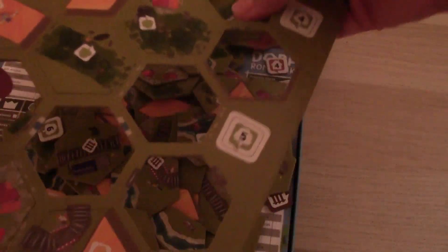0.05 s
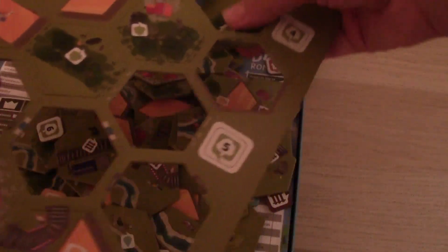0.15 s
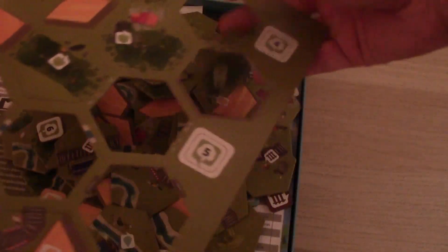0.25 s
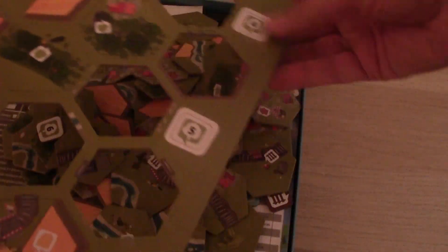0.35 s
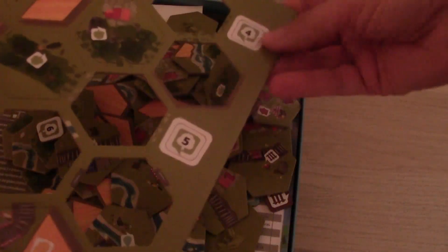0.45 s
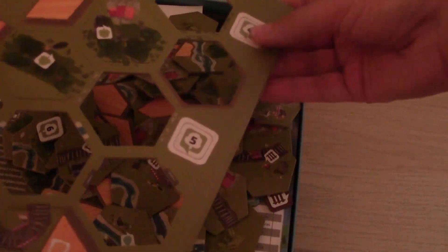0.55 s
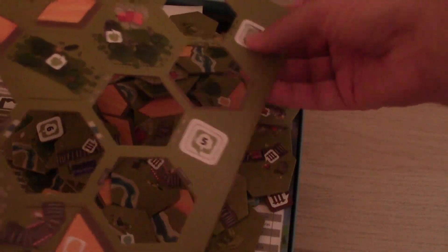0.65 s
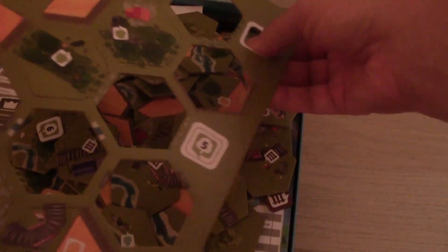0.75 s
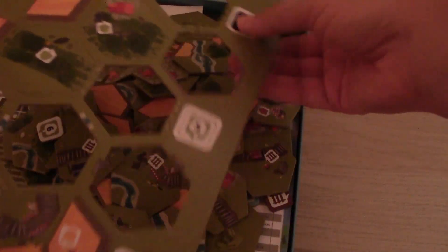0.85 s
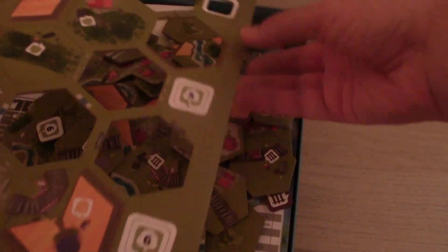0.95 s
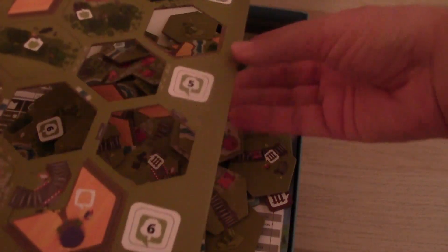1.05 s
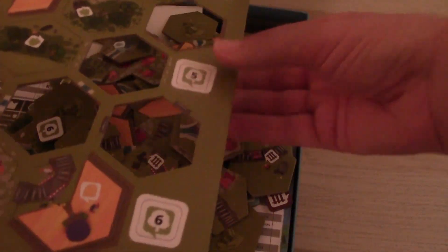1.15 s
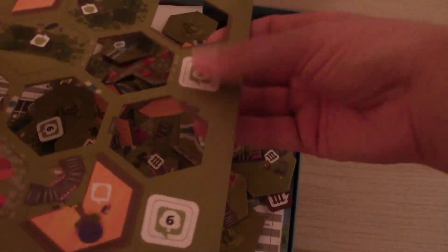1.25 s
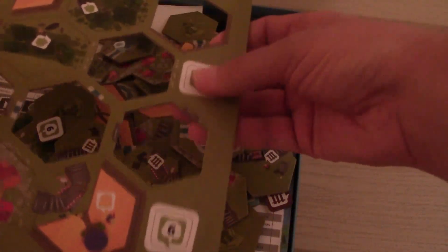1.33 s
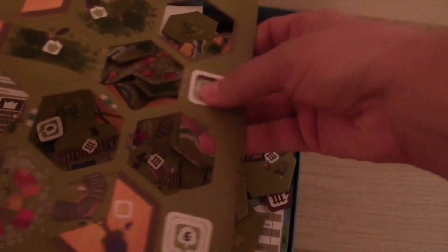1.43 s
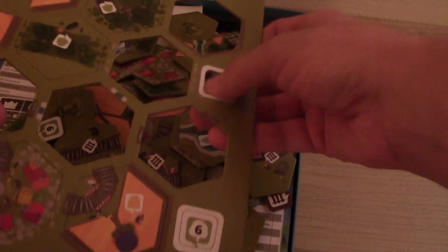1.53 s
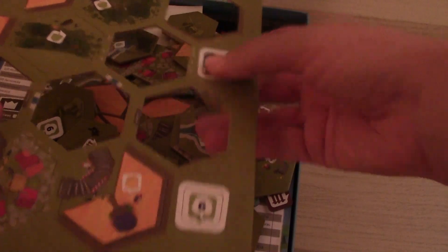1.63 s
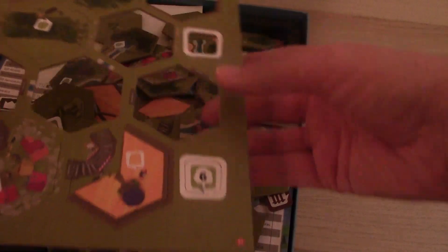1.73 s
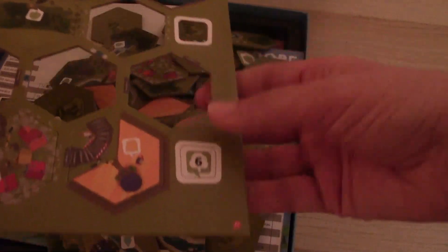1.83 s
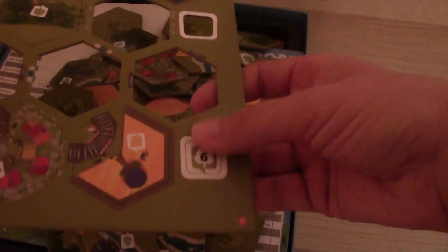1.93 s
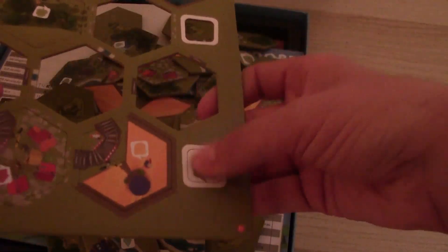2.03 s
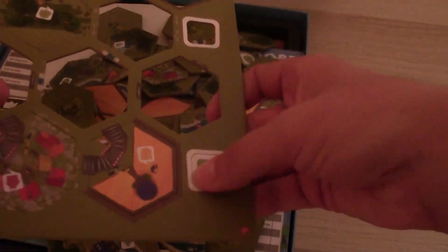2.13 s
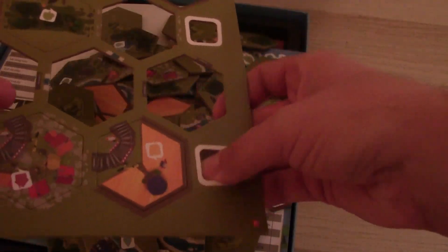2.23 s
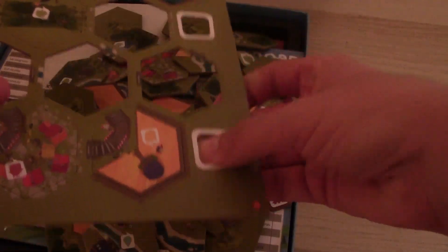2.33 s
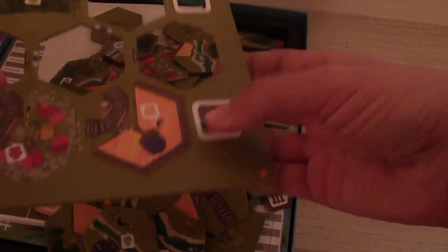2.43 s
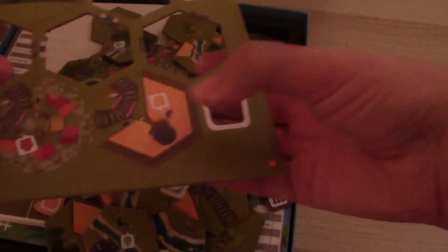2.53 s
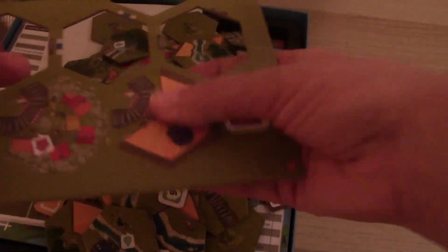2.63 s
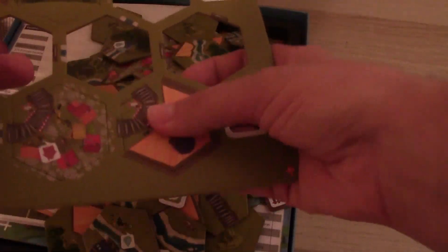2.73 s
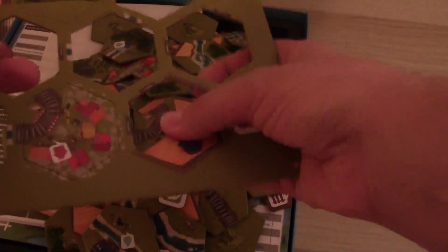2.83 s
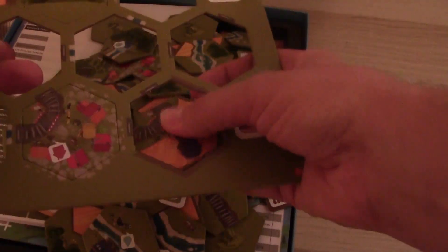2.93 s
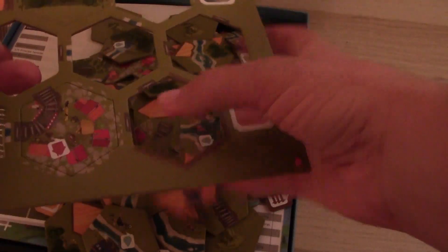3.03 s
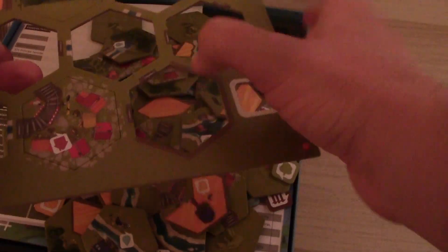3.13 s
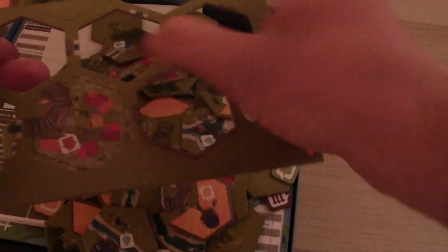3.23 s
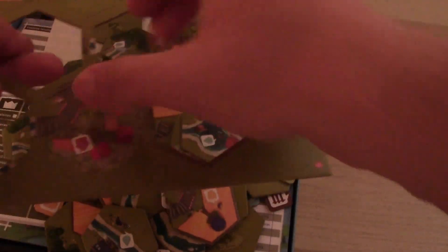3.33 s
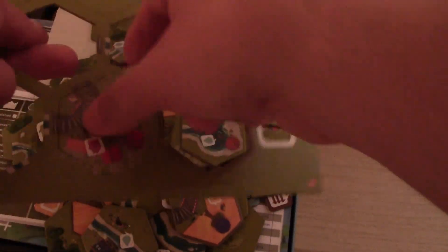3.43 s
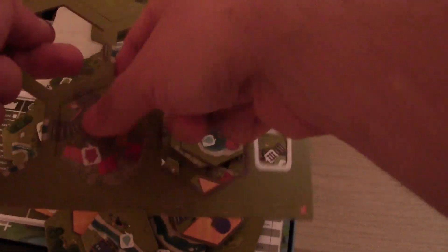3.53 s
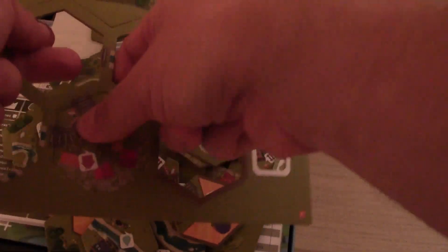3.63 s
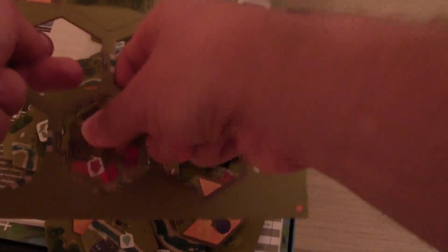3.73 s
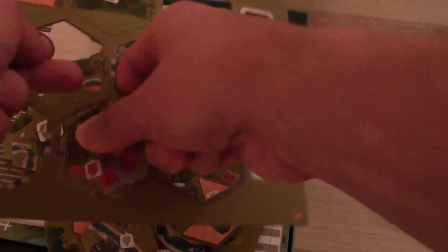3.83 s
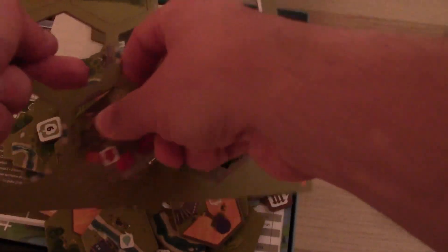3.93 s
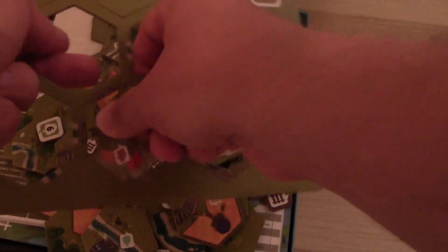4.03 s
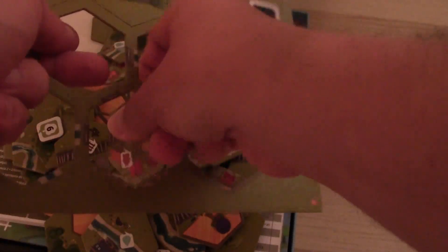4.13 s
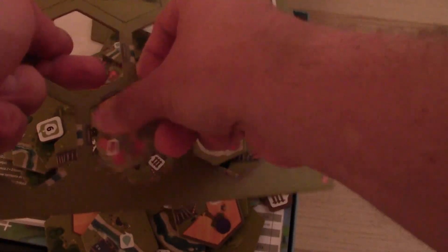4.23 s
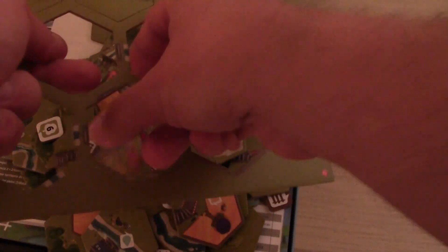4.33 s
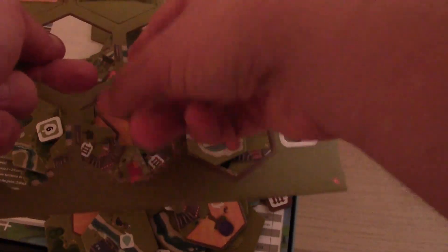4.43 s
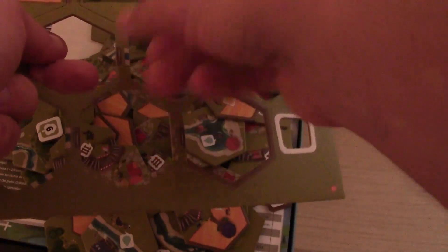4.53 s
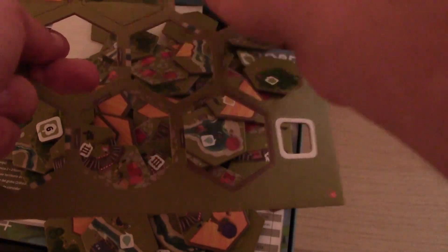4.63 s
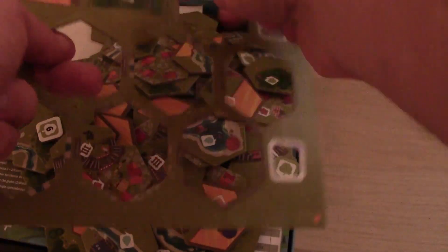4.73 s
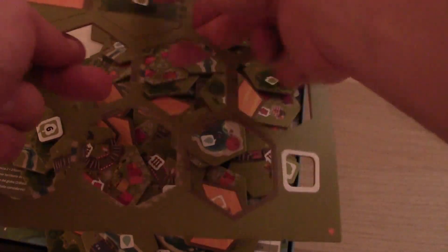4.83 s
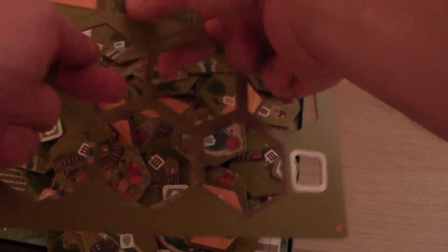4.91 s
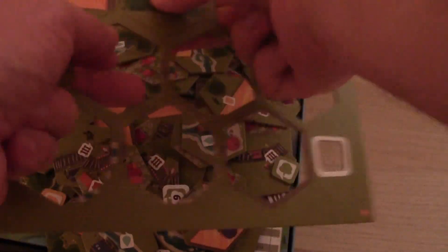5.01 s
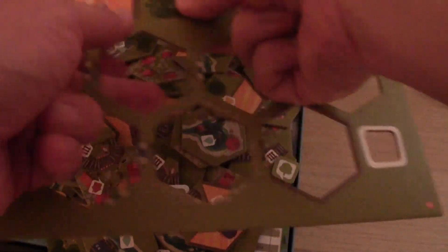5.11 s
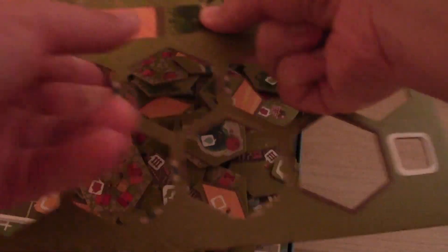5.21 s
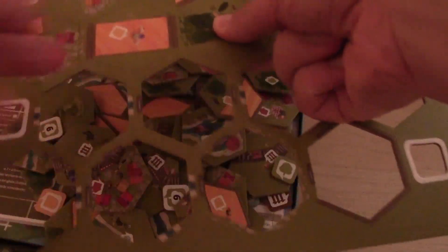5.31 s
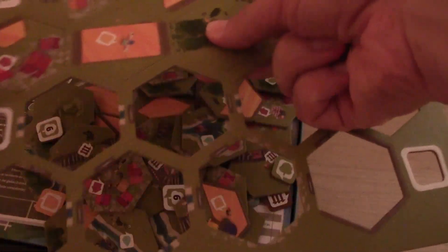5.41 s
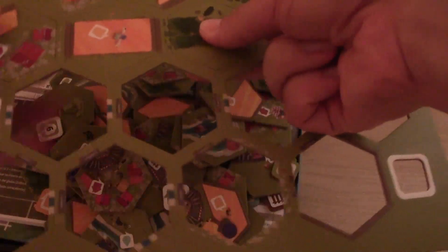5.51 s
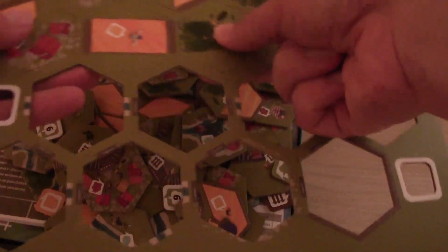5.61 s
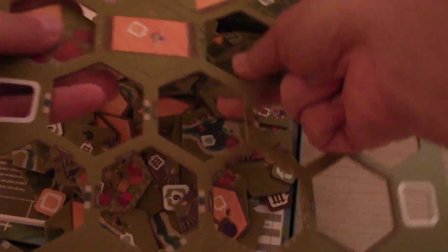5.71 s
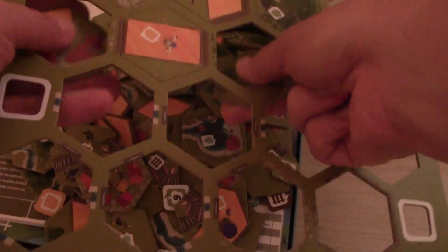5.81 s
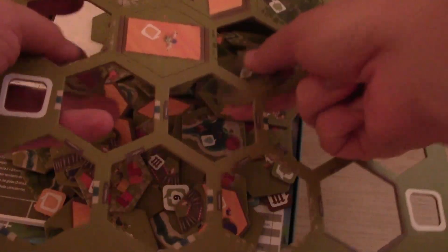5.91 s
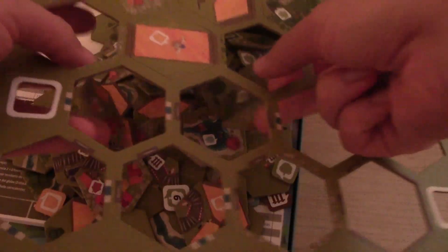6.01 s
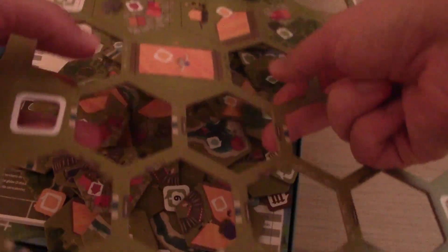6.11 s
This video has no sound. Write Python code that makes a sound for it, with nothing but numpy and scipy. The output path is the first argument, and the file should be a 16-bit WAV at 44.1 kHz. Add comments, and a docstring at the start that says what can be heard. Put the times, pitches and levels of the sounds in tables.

```python
"""Hands punch thick cardboard tiles out of a sheet, close to two microphone ports in a quiet room.
The first bridges tear at once in short bursts of fibre cracks; from 0.35 s freed tiles land in the box
below, ring and settle on the pile. Tears and knocks alternate, with rubbing and low swings of the sheet.
From 4.8 s the sheet is shifted in the hands and stops short at 5.35 s; the last bridges tear near 5.75 s
and the last tile lands near 6.1 s. Steady grip friction, faint creaks and room tone run throughout."""
import sys
import numpy as np
from scipy import signal
from scipy.fft import rfft, irfft, next_fast_len
from scipy.io import wavfile
from scipy.ndimage import uniform_filter1d

SR = 44100
rng = np.random.default_rng(int(sys.argv[2]) if len(sys.argv) > 2 else 0)


def materialize(psi):
    """Save the field psi as 16-bit PCM at rate SR to the path in sys.argv[1].

    A 1-D psi becomes a single channel; in a 2-D psi each row is a channel.
    """
    bounded = np.clip(np.atleast_2d(psi).T, -1, 1)
    quanta = np.round(bounded * 32767).astype(np.int16)
    wavfile.write(sys.argv[1], SR, quanta)


N = 271899

# Paper bridges tearing: start_s, length_s, crack_level_db, crack_pitch_hz, fibre_fizz_level_db
BRIDGE_TEARS = [(0.0834, 0.003, 7.5, 3970, 11), (0.0913, 0.0035, 5, 3610, 2), (0.719, 0.0026, 3, 5110, 9),
                (0.7281, 0.0028, -2.5, 1500, 14), (1.4625, 0.0048, -6, 5560, 5),
                (1.4994, 0.0026, 2, 5800, 12), (1.9383, 0.0039, 5, 3020, -9),
                (2.207, 0.0014, -3, 1110, -8.5), (2.2268, 0.0012, 1.5, 1220, 5.5),
                (2.236, .0013, 4, 1610, 8.5), (2.246, 0.0036, 1, 3860, 4.5),
                (2.711, 0.00085, -10, 2540, -10), (2.8172, 0.0026, -7.5, 3400, -2),
                (2.851, 0.0019, -6, 3200, -5), (2.858, 0.0035, 10.5, 3340, 9),
                (3.1325, 0.0038, 12.5, 2390, 6), (3.7437, 0.0042, 2, 1250, -7), (3.749, 0.0021, 5, 1160, 0),
                (3.7546, 0.003, 7, 1440, 9), (4.1286, 0.0067, 10.5, 3600, 7),
                (4.171, 0.0062, -3.5, 2480, -7), (5.733, 0.0061, 6.5, 4140, 12),
                (5.7481, 0.0032, 8.5, 2350, 7.5), (5.7543, 0.0056, 3.5, 3800, 1.5)]
# Tiles landing, bouncing or being tapped: start_s, box_level_db, tile_level_db, edge_tick_level_db
TILE_KNOCKS = [(0.3515, 5, 8.5, 1), (0.3549, 9.5, 9.5, -3), (0.371, -18, 3.5, -13), (0.6098, 6.5, 4, -3.5),
               (0.6141, -3.5, 4.5, -2.5), (0.7208, 10.5, 6, -7), (0.9801, -13, -9, -20),
               (0.9932, -3.5, 6.5, -8.5), (1.0321, -4.5, -7, -26), (1.0556, 5, 1, -22),
               (1.0757, -1, -10, -36), (1.12, -9, -7, -35), (1.1452, -4, -6, -19.5),
               (1.2111, -14.5, -18.5, -23.5), (1.345, -23, -20.5, -13.5), (1.7217, -5.5, 11.5, -6.5),
               (1.7963, -22, 1, -14.5), (1.8099, -20, -11, -35), (1.8562, -12, 9, -9),
               (1.9351, -20.5, 2, 0), (1.9458, -36, -1, -23), (2.018, -6.5, -8.5, -27),
               (2.5475, -3, 11, -13), (2.616, -20, -15, -11), (2.6265, -21.5, -6.5, -18),
               (2.6433, -23, -11, -12), (2.6522, -20, -10.5, -21), (2.6747, -19, -12, -21),
               (3.12, 2, 5, -7.5), (3.1369, 2.5, -10, -5), (3.1463, 6, -18, -23), (3.1795, -4, -9, -16.5),
               (3.2158, -16, 1, 0), (3.2965, -13, -15, -22), (4.4062, -6, 4, -9.5),
               (4.4129, -5.5, 7.5, -7.5), (4.4395, 9.5, 6.5, -13), (4.4429, 11.5, 8.5, 2),
               (4.4606, -8, 0, -7), (4.5093, -6, -1.5, -4), (4.7805, -21, -29, -34),
               (5.6304, 3.5, 2.5, -9.5), (5.64, -23, -3.5, -8), (6.0579, 4, 10, -2), (6.0815, 3, 12.5, -2),
               (6.157, -8, -2.5, -17)]
# Each falling tile's own pitch and spot in the box: from_s, favoured_tile_hz, favoured_box_hz
TILE_FALLS = [(.3, 1380, 705), (.55, 3480, 353), (.68, 1410, 490), (.9, 2130, 547), (1.6, 2830, 405),
              (2.4, 1890, 600), (3.05, 2350, 260), (4.3, 2480, 690), (5.5, 1140, 670), (5.95, 1780, 345)]
# Skin or a cut edge sliding on the sheet: start_s, length_s, scrape_level_db, hiss_level_db, resonance_hz
RUB_STROKES = [(-.02, 0.069, -38, -37, 3520), (0.206, .045, -50, -45, 5270),
               (0.389, 0.13, -41.5, -45, 2300), (.5, 0.22, -48, -45, 600), (0.638, 0.16, -44, -37, 9150),
               (0.874, 0.063, -50, -43.5, 4850), (1.336, 0.064, -54, -41, 3240),
               (1.667, 0.047, -42, -41.5, 700), (1.928, .12, -43, -39, 2520),
               (2.067, .11, -59, -38.5, 9300), (2.424, 0.048, -33.5, -39.5, 1070),
               (2.714, 0.04, -42, -40.5, 3390), (2.753, 0.055, -39.5, -41.5, 3500),
               (3.409, .12, -48.5, -50, 1870), (3.525, 0.1, -50, -48.5, 2840),
               (3.944, 0.057, -47.5, -41.5, 1194), (4.066, 0.048, -45.5, -42.5, 673),
               (4.553, .06, -39, -42, 1820), (5.208, 0.054, -34, -59, 780), (5.605, 0.16, -39, -41, 11200),
               (5.884, .09, -46, -40.5, 3970)]
# The sheet shifted in the hands: time_s, friction_level_db
SHEET_SHIFT = [(4.8, -76), (4.878, -50), (5.018, -51), (5.036, -46.5), (5.094, -47.5), (5.134, -41),
               (5.196, -49.5), (5.332, -32), (5.345, -44)]
# The sheet springing back or being pushed: start_s, level_db before damping, bending_pitch_hz
SHEET_FLEXES = [(.086, -31.5, 55.6), (1.351, -43.5, 108), (1.5, -41, 111.6), (1.939, -42.5, 46),
                (2.237, -46, 94), (2.712, -36.5, 61.7), (2.776, -34, 80.4), (2.857, -28, 62),
                (3.756, -36, 108), (4.13, -37, 92), (4.765, -37.5, 64.2), (5.61, -29.5, 93.5),
                (5.632, -29.5, 100)]

# Modes of a loose tile, and of the box with its pile: pitch_hz, level_db, t60_s
TILE_MODES = [(1042, -9.5, 0.019), (1187, -8.5, 0.021), (1424, -1.5, 0.012), (1706, 4, 0.0043),
              (2066, -3.5, 0.0089), (2480, -2.5, 0.016), (2714, -1, 0.012), (3240, -0.5, 0.0083),
              (3970, -3.5, 0.007), (4580, -6, 0.0096), (5350, -7, 0.0082)]
BOX_MODES = [(108, -24.5, 0.33), (180, -46, 0.045), (240.5, -8.5, 0.08), (311, -8.5, 0.062),
             (346, -6, 0.075), (417.4, -6.5, 0.05), (500, -6.5, 0.072), (604, -1, 0.042), (689, 2, 0.048),
             (780, -13, 0.018)]

# Spectra of a tear (shaken board, cracking card, fizzing fibres): frequency_hz, level_db (per Hz)
BOARD_SPECTRUM = [(40, -20.5), (150, -7), (320, -11), (600, 2), (800, 1.5), (1100, -15), (2500, -50.5)]
CRACK_SPECTRUM = [(400, -26), (800, -8.5), (1200, -0.5), (1600, 2), (2200, -4), (3400, -1), (5200, -8),
                  (7000, -16), (14000, -59)]
FIZZ_SPECTRUM = [(2500, -30.5), (5000, 1), (6500, -1), (11000, -0.5), (15500, -6.5), (18000, 1)]
# Spectra of an edge tick, of the settling tiles and of the box under them: frequency_hz, level_db (per Hz)
TICK_SPECTRUM = [(2000, -14.5), (4500, 3), (7000, 0.5), (10000, -3), (13000, -11), (17000, -28)]
CLATTER_SPECTRUM = [(700, -14), (1500, -5.5), (2100, -5), (2600, 3), (3300, -14), (6000, -18), (14000, -33)]
THUD_SPECTRUM = [(60, -22), (105, 1), (160, -10), (245, -2), (330, -0.5), (520, 1), (680, -1), (950, -10.5),
                 (2000, -34.5)]
# Spectra of rough card and of smooth print under friction: frequency_hz, level_db (per Hz)
SCRAPE_SPECTRUM = [(80, -3), (250, -4), (600, 3), (950, -2), (1500, -1.5), (3500, -0.5), (5500, -18),
                   (12000, -38)]
HISS_SPECTRUM = [(1500, -10), (3500, -3.5), (5000, 3.5), (7500, 0.5), (11000, -1.5), (16000, -10)]
# How the held sheet passes friction on to the air: frequency_hz, gain_db
SHEET_GAIN = [(100, -4), (1000, 0), (15000, -0.5)]
# Room tone: frequency_hz, level_db (per Hz)
AIR_SPECTRUM = [(15, -20), (25, 2), (48, 5), (200, 5.5), (416, 2), (714, 1.5), (863, -4.5), (1230, -1.5),
                (2760, -12), (3340, -10.5), (10700, -21.5), (14800, -20.5), (16000, -36.5)]
# Decay of the room: frequency_hz, t60_s
ROOM_DECAY = [(100, .5), (500, 0.2737), (2500, 0.22), (6000, 0.34), (14000, 0.15)]
# Colour of the room's echo: frequency_hz, level_db
ECHO_COLOUR = [(100, 4), (520, 3), (900, -3.5), (1400, 5), (2600, -1), (4500, -3), (14000, -2)]
# What differs between the microphone ports: frequency_hz, level_db (relative to what they share)
PORT_SIDE = [(30, -11), (120, -9.5), (300, -17), (1000, -32.5), (2500, -30), (5000, -21), (9000, -19),
             (14000, -12)]

TEAR_RISE = 0.36  # share of a tear's length in which it builds up
BOARD_DB = -10.5  # board shaking, relative to the mean of crack and fizz
FIZZ_HZ, FIZZ_OCTAVES_PER_DB = 8110, 0.02  # the more the fizz outweighs the crack, the higher it lies
# Neighbouring tiles rattle and settle after a knock; levels are relative to its tile and box
SETTLE_S, SETTLE_PER_S, SETTLE_TILE_DB, SETTLE_BOX_DB = 0.045, 200, -18.5, -10.5
RUB_RISE = 0.36  # share of a stroke in which it swells
# Cut edges rub before and after each tear, more so after a strong one; levels are for 0 dB crack and fizz
PRESS_S, SLIP_S, SLIP_HZ = 0.031, 0.11, 3960
SLIP_SCRAPE_DB, SLIP_HISS_DB, SLIP_DB_PER_DB = -50, -49.5, 0.5759
# Under more pressure the scrape of the shifted sheet grows faster than the hiss
SHIFT_HISS_DB, SHIFT_SCRAPE_DB, SCRAPE_DB_PER_DB, SHIFT_HZ = -0.5, 13.5, 1.51, 1214
HOLD_SCRAPE_DB, HOLD_HISS_DB, HOLD_HZ = -52, -58.5, 8900  # the fingers never rest quite still
CREAKS_PER_S, CREAK_DB, CREAK_SPREAD_DB = 7, -24.5, 1.5  # single fibres give way in the bent sheet
AIR_DB = -54
EDGE_HZ = 16100  # upper band limit


def tears():
    """Breaking fibres fizz, crack in the stiff card around the cut, and shake the whole board."""
    out = np.zeros(N)
    for s, length, crack_db, crack_hz, fizz_db in BRIDGE_TEARS:
        rise, fade = TEAR_RISE * length, (1 - TEAR_RISE) * length
        board_db = BOARD_DB + (crack_db + fizz_db) / 2
        fizz_hz = FIZZ_HZ * 2 ** (FIZZ_OCTAVES_PER_DB * (fizz_db - crack_db))
        main, lead = fibres(rise, fade, spread_db=6)
        # stray fibres go before and after
        stray, _ = fibres(2.0 * rise, 0.0058, spread_db=-1.5)
        burst = unit(main) + amp(-13.5) * unit(stray)
        board = colour(burst, BOARD_SPECTRUM)
        crack = colour(burst, CRACK_SPECTRUM, crack_hz, lift_db=12.5, octaves=0.12)
        fizz = colour(burst, FIZZ_SPECTRUM, fizz_hz, lift_db=8.0, octaves=0.36)
        add(out, s - lead, amp(board_db) * unit(board))
        add(out, s - lead, amp(crack_db) * unit(crack))
        add(out, s - lead, amp(fizz_db) * unit(fizz))
    return out


def fibres(rise, fade, spread_db, size=2048):
    """An avalanche of tiny cracks of uneven size; also returns the time of its peak, mid-span."""
    t = (np.arange(size) - size // 2) / SR
    decay = np.where(t < 0, -t / max(rise, 1 / SR), t / max(fade, 1 / SR))
    signs, sizes = rng.standard_normal((2, size))
    cracks = np.sign(signs) * amp(spread_db * np.minimum(sizes, 2))
    return np.exp(-decay) * cracks, size / 2 / SR


def knocks():
    """A tile's edge ticks, the tile rings briefly, and the box booms while its pile settles."""
    out = np.zeros(N)
    for s, box_db, tile_db, tick_db in TILE_KNOCKS:
        _, tile_hz, box_hz = [fall for fall in TILE_FALLS if fall[0] <= s][-1]
        tile = ring(TILE_MODES, detune=0.046, centre_hz=tile_hz, lift_db=9.5, octaves=0.18, size=1024)
        tile = radiate(tile, corner_hz=600)
        box = ring(BOX_MODES, detune=0.0287, centre_hz=box_hz, lift_db=7.5, octaves=0.1, size=5120)
        box = radiate(box, corner_hz=96.0)
        tile_touch = contact(chatter=0.49, fade=0.0026, per_s=1100)
        box_touch = contact(chatter=0.26, fade=0.045, per_s=730)
        edge_touch = contact(chatter=2.5, fade=0.0025, per_s=6400)
        add(out, s, amp(tile_db) * unit(signal.fftconvolve(tile_touch, tile)))
        add(out, s, amp(box_db) * unit(signal.fftconvolve(box_touch, box)))
        add(out, s, amp(tick_db) * unit(colour(edge_touch, TICK_SPECTRUM)))
        rattle = settle(spread_db=4)
        add(out, s, amp(tile_db + SETTLE_TILE_DB) * unit(colour(rattle, CLATTER_SPECTRUM)))
        add(out, s, amp(box_db + SETTLE_BOX_DB) * unit(colour(rattle, THUD_SPECTRUM)))
    return out


def contact(chatter, fade, per_s, size=4096):
    """One hard touch, then a dying chatter of light touches."""
    t = np.arange(size) / SR
    touches = rng.standard_normal(size) * (rng.random(size) < per_s / SR) * np.exp(-t / fade)
    return (t == 0) + chatter * unit(touches)


def ring(modes, detune, centre_hz, lift_db, octaves, size):
    """Dying modes; every contact point shifts them a little, sets their signs and favours one range."""
    hz, db, t60 = np.transpose(modes)[:, :, None]
    t = np.arange(size) / SR
    shift, side = rng.standard_normal((2, len(modes), 1))
    hz = hz * (1 + detune * np.clip(shift, -1, 1))
    strength = np.sign(side) * amp(db + lift_db * hump(hz, centre_hz, octaves))
    decay = np.exp(-np.log(1000) * t / t60)
    return (strength * decay * np.sin(2 * np.pi * hz * t)).sum(0)


def radiate(x, corner_hz):
    """A small plate moves little air below its corner frequency."""
    return signal.lfilter(*signal.butter(2, corner_hz, "high", fs=SR), x)


def settle(spread_db, size=12000):
    """Light touches of uneven size that die away as the pile comes to rest."""
    t = np.arange(size) / SR
    signs, sizes = rng.standard_normal((2, size))
    touched = rng.random(size) < SETTLE_PER_S / SR
    return unit(np.sign(signs) * amp(spread_db * sizes) * touched * np.exp(-t / SETTLE_S))


def rubs():
    """Fingers stroke the sheet, and each tile's edge slips through its cut as a bridge gives way."""
    out = np.zeros(N)
    for start, length, scrape_db, hiss_db, tint_hz in RUB_STROKES:
        add(out, start, stroke(RUB_RISE * length, (1 - RUB_RISE) * length, scrape_db, hiss_db, tint_hz))
    for s, _, crack_db, _, fizz_db in BRIDGE_TEARS:
        scrape_db = SLIP_SCRAPE_DB + SLIP_DB_PER_DB * crack_db
        hiss_db = SLIP_HISS_DB + SLIP_DB_PER_DB * fizz_db
        add(out, s - PRESS_S, stroke(PRESS_S, SLIP_S, scrape_db, hiss_db, SLIP_HZ))
    return out


def stroke(rise, fade, scrape_db, hiss_db, tint_hz, size=12000):
    """Friction that swells and dies."""
    swell = np.interp(np.arange(size) / SR, [0, rise, rise + fade], [0, 1, 0])
    return friction(amp(scrape_db) * swell, amp(hiss_db) * swell, tint_hz)


def friction(scrape_gain, hiss_gain, tint_hz):
    """Rough card scrapes, smooth print hisses, and one resonance stands out."""
    count = len(scrape_gain)
    scrape = noise(SCRAPE_SPECTRUM, count) * grain(depth_db=2.5, size=170, count=count)
    hiss = noise(HISS_SPECTRUM, count) * grain(depth_db=2.5, size=60, count=count)
    # the sheet rings most freely in the midrange
    tint_db = 3 + 9 * hump(tint_hz, centre_hz=1180, octaves=0.82)
    rubbing = scrape_gain * scrape + hiss_gain * hiss
    return colour(rubbing, SHEET_GAIN, tint_hz, tint_db, octaves=0.23, size=512)


def grain(depth_db, size, count):
    """Uneven grip of a sliding surface: a gain of rms 1."""
    grip = unit(uniform_filter1d(rng.standard_normal(count), size)) * np.sqrt(count)
    return unit(amp(depth_db * grip)) * np.sqrt(count)


def handling():
    """The held sheet creeps faintly in the fingers, and once slides through them and stops short."""
    creep = grain(depth_db=3.5, size=4000, count=N)
    s, db = np.transpose(SHEET_SHIFT)
    level_db = np.interp(np.arange(N) / SR, s, db, left=-np.inf, right=-np.inf)
    scrape_gain = amp(SHIFT_SCRAPE_DB + SCRAPE_DB_PER_DB * level_db)
    slide = friction(scrape_gain, amp(SHIFT_HISS_DB + level_db), SHIFT_HZ)
    hold = friction(amp(HOLD_SCRAPE_DB) * creep, amp(HOLD_HISS_DB) * creep, HOLD_HZ)
    return (slide + hold)[:N]


def flexes():
    """The sheet swings a few times in three bending partials, heavily damped."""
    out, t = np.zeros(N), np.arange(SR // 4) / SR
    for s, db, hz in SHEET_FLEXES:
        swing = np.sin(2 * np.pi * hz * t)
        swing += 0.51 * np.sin(2 * np.pi * hz * 1.716 * t)
        swing += 0.31 * np.sin(2 * np.pi * hz * 0.58 * t)
        envelope = (1 - np.exp(-t / 0.0019)) * np.exp(-t / 0.02)
        add(out, s, amp(db) * swing * envelope)
    return out


def creaks():
    """Faint stray ticks from the bent sheet, where single fibres give way."""
    levels_db = CREAK_DB + CREAK_SPREAD_DB * np.clip(rng.standard_normal(N), -2, 2)
    sizes = amp(levels_db) * (rng.random(N) < CREAKS_PER_S / SR)
    touch = contact(chatter=1, fade=0.0012, per_s=5700)
    tick = unit(colour(touch, TICK_SPECTRUM)) + amp(-3) * unit(colour(touch, CRACK_SPECTRUM))
    return signal.oaconvolve(sizes, tick)[:N]


def room(x, size=256):
    """Echoes off the table and walls: a diffuse tail whose decay time depends on frequency."""
    t = np.arange(SR * 3 // 4) / SR
    taps = rng.standard_normal(len(t)) * (rng.random(len(t)) < 4000 / SR) * (t > 0.005)
    hz, frame_s, z = signal.stft(taps, SR, nperseg=size)
    decay_db = -60 * frame_s / read(ROOM_DECAY, hz)[:, None]
    z = z * amp(read(ECHO_COLOUR, hz)[:, None] + decay_db)
    return signal.oaconvolve(x, unit(signal.istft(z, SR, nperseg=size)[1]))[:N]


def ports(x):
    """Two close microphone ports hear nearly the same; they differ a little in phase."""
    size = next_fast_len(N, True)
    side_gain = amp(read(PORT_SIDE, np.fft.rfftfreq(size, 1 / SR)))
    side = irfft(1j * rfft(x, size) * side_gain, size)[:N]  # 1j: a quarter turn of phase
    return np.array([x + side, x - side])


def air():
    """Faint room tone, with hiss that differs between the ports."""
    shared = noise(AIR_SPECTRUM)
    opposed = np.array([[1], [-1]]) * noise(AIR_SPECTRUM)
    return amp(AIR_DB) * (shared + 0.85 * opposed)


def noise(spectrum, count=N):
    """Steady noise of rms 1."""
    size = next_fast_len(count, True)
    shaped = rfft(rng.standard_normal(size)) * amp(read(spectrum, np.fft.rfftfreq(size, 1 / SR)))
    return unit(irfft(shaped, size)[:count]) * np.sqrt(count)


def colour(x, spectrum, centre_hz=1000, lift_db=0, octaves=1, size=2048):
    """Causal (minimum-phase) filter with the given spectrum and one extra resonance."""
    hz = abs(np.fft.fftfreq(size, 1 / SR))
    log_gain = np.log(amp(read(spectrum, hz) + lift_db * hump(hz, centre_hz, octaves)))
    response = np.exp(np.conj(signal.hilbert(log_gain)))
    return signal.fftconvolve(x, np.fft.ifft(response).real[:size // 2])


def hump(hz, centre_hz, octaves):
    """A bell of height 1 around a frequency."""
    return np.exp(-0.5 * (np.log2((hz + 1) / centre_hz) / octaves) ** 2)


def read(points, hz):
    """Reads a spectrum along a logarithmic frequency axis."""
    f, value = np.transpose(points)
    return np.interp(np.log(hz + 1), np.log(f + 1), value)


def amp(db):
    """Turns decibels into a gain."""
    return 10 ** (np.asarray(db) / 20)


def unit(x):
    """Scales a sound to energy 1."""
    return x / np.sqrt(np.sum(x ** 2) + 1e-20)


def add(mix, s, sound):
    """Mixes a sound in at time s, cutting what falls outside."""
    start = round(s * SR)
    sound = sound[max(-start, 0):]
    part = mix[max(start, 0):][:len(sound)]
    part += sound[:len(part)]


def scene():
    """Sheet and pile are close to the microphone ports, so the room is faint."""
    sheet = tears() + rubs() + handling() + flexes() + creaks()
    pile = knocks()
    echo = room(amp(-19) * sheet + amp(-14.5) * pile)
    return ports(sheet + pile + echo) + air()


def record(dry):
    """The loudest snaps are rounded off by overload; then the band limit."""
    ceiling = 0.91
    rounded = dry / (1 + (dry / ceiling) ** 4) ** (1 / 4)
    band = signal.firwin(201, EDGE_HZ, window=("kaiser", 7), fs=SR)
    return signal.oaconvolve(rounded, band[None], "same")


dry = scene()
out = record(dry)
materialize(out)
```